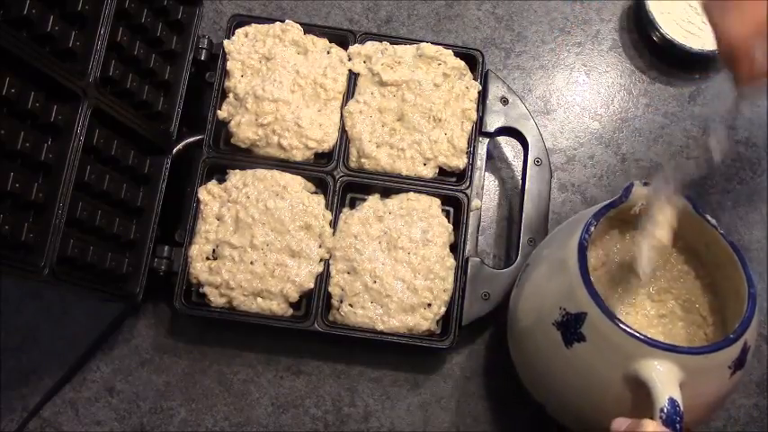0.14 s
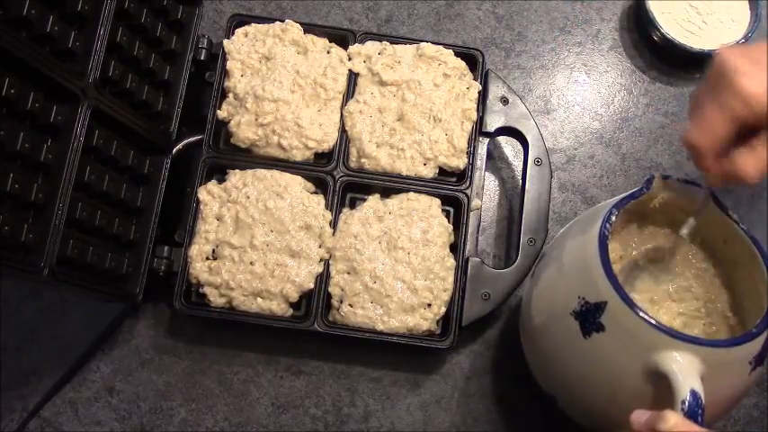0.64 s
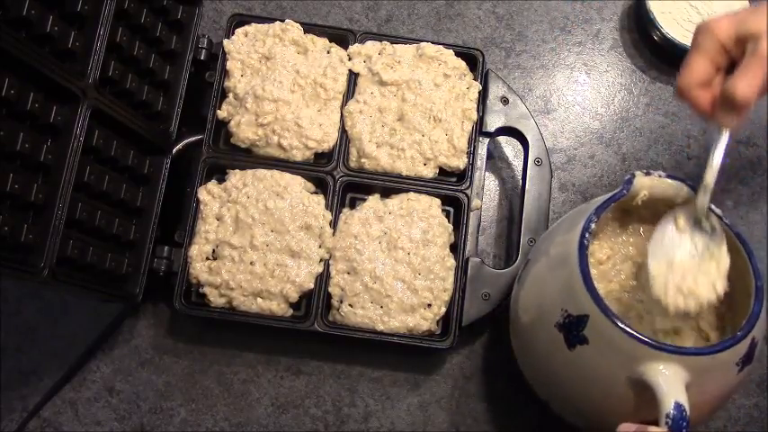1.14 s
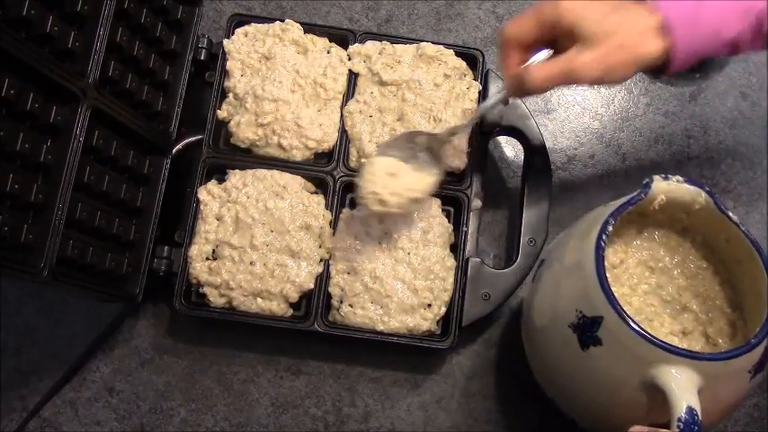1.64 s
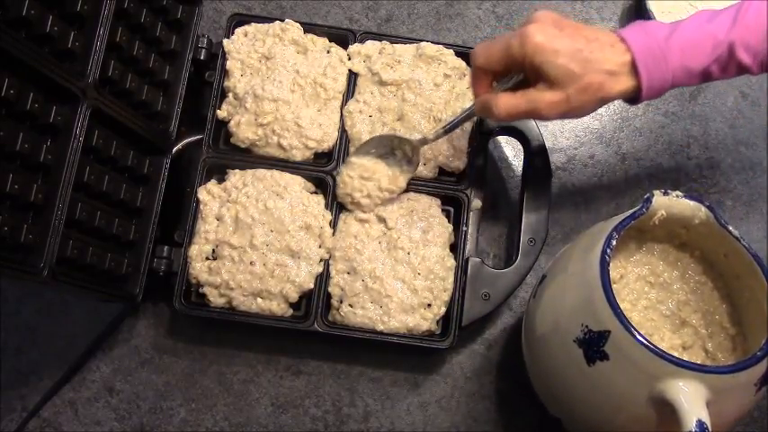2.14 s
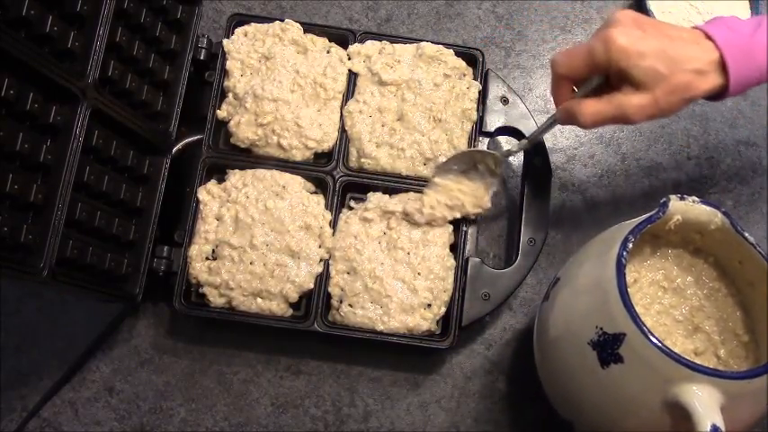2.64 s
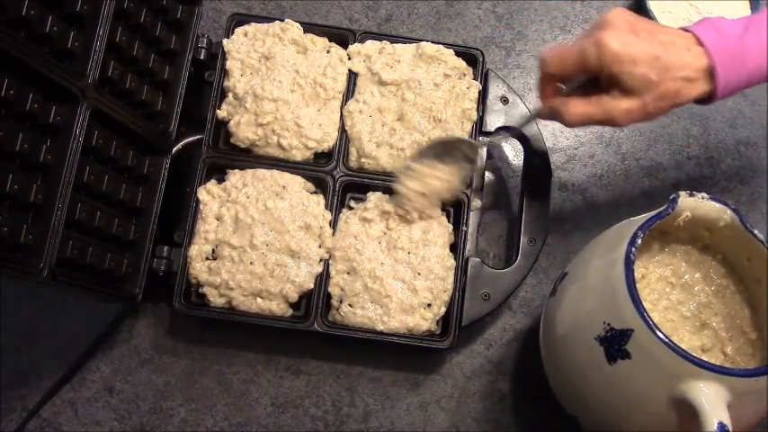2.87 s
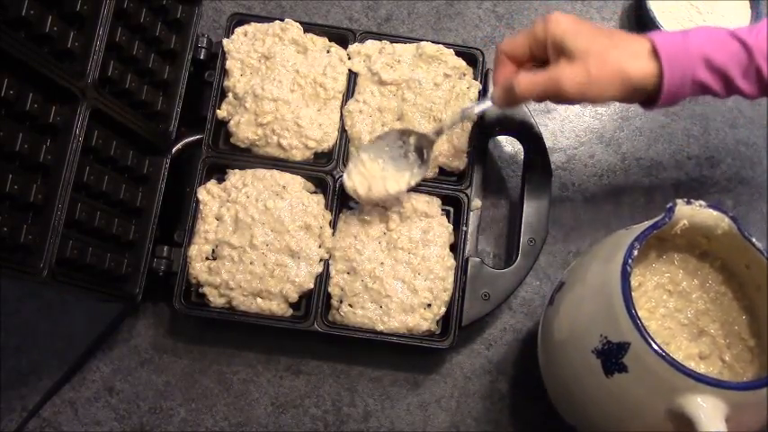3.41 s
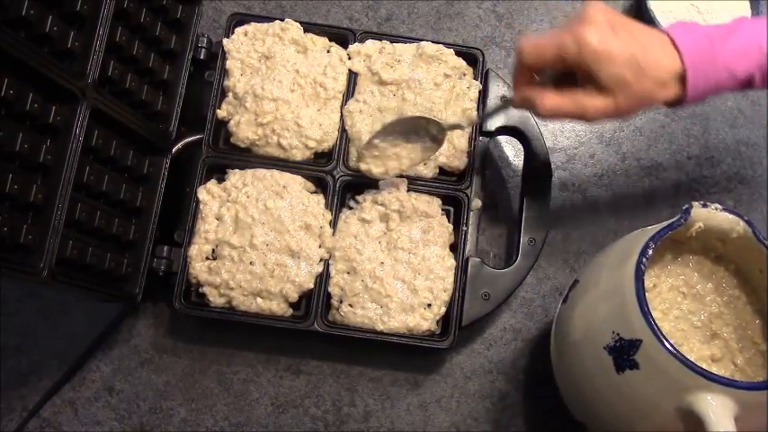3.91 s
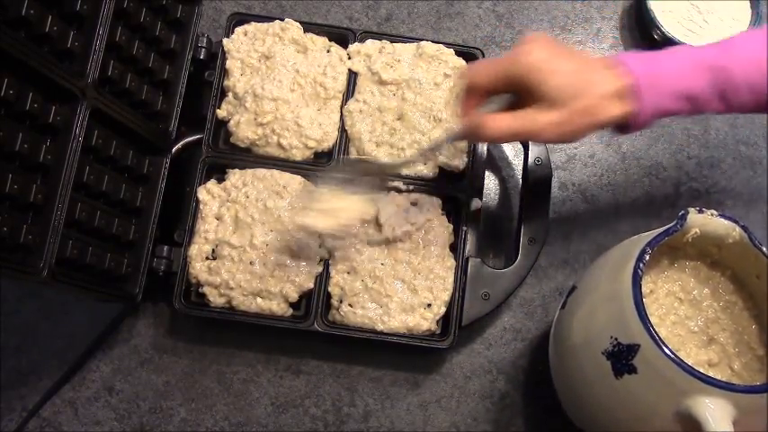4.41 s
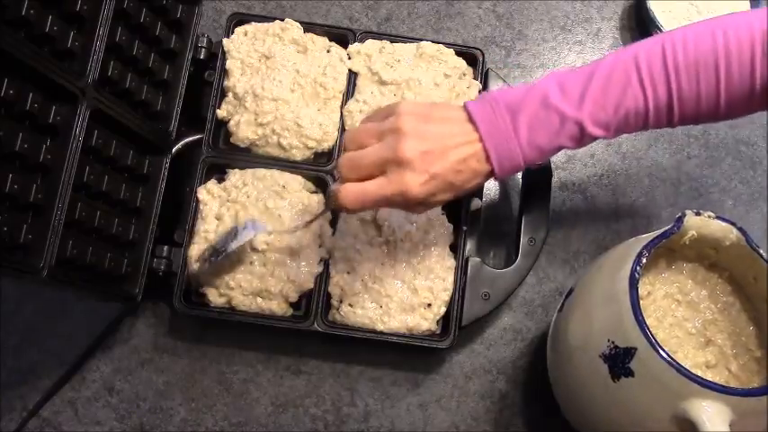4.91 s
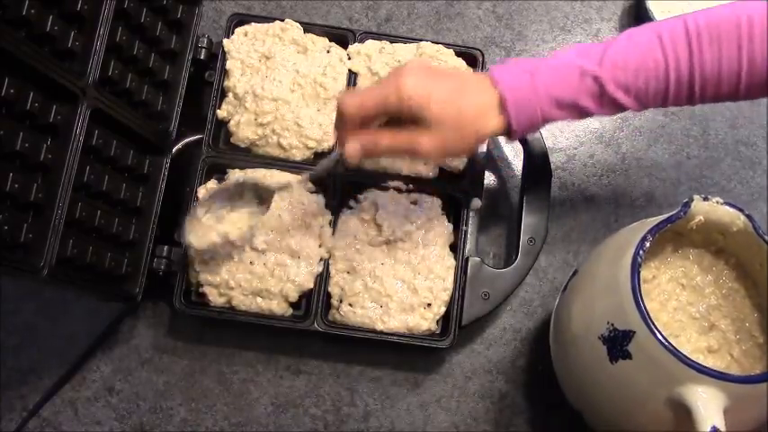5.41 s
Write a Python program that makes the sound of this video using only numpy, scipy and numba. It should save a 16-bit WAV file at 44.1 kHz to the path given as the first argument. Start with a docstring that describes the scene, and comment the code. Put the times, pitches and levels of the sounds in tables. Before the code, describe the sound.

A small, hard-surfaced kitchen, heard close in stereo. A low, quiet appliance drone runs throughout, under a fine hissing sizzle with dense crackle, soft gurgling and little steam pops, busiest at first and gradually thinning. At about 0.1 s a spoon gives the waffle iron a dull knock. At 0.33 s it clinks brightly in a stoneware pitcher and slides down the wall with a gritty scrape lasting a tenth of a second. Then only sizzle and pops until a faint tick and a strong clack at 2.15 s. A duller knock follows at 2.8, a bright hard one at 3.05, a tiny rising bubble at 3.5, another sharp clack at 4.1, a faint tick at 4.3, light touches and a firm knock around 4.8-4.9, and a last faint tick at 5.4. Knocks are very short and damped, with quick room reflections and a faint dull echo; loud hits are slightly compressed.

```python
"""A small hard kitchen: a spoon clinks and slides in a stoneware pitcher, and knocks through wet batter onto the
grid of a hot waffle iron. Blows are sums of damped modes with a noise crack and a low thud; the slide is
noise exciting the pitcher's modes. Batter sizzles and pops as short noise spits and damped tones, over a low
appliance drone of shaped noise. The room reflects blows and slide; gain control ducks the loudest sounds."""
import sys
import numpy as np
from scipy import signal
from scipy.fft import rfft, irfft
from scipy.io import wavfile
from scipy.ndimage import uniform_filter1d
from numba import njit

SR = 44100
rng = np.random.default_rng(int(sys.argv[2]) if len(sys.argv) > 2 else 0)


def gain_from_db(level_db):
    """Convert decibel levels to linear amplitude factors (20 dB per decade)."""
    decades = np.asarray(level_db, float) / 20
    return 10 ** decades


def dump(signal):
    """Clip the signal to [-1, 1] and save it as 16-bit WAV at the path in sys.argv[1]."""
    limited = np.clip(np.atleast_2d(signal).T, -1, 1)
    pcm = np.round(limited * 32767).astype(np.int16)
    wavfile.write(sys.argv[1], SR, pcm)


N = 243740  # samples
T = np.arange(N) / SR  # s

# blows on the iron: [t/s, thud level/dB, thud f/Hz of the loaded spoon bowl, ring level/dB,
# brightness/(dB per octave), favoured mode f/Hz]
IRON_BLOWS = [(0.0892, -11, 531, -24, -6, 1460), (2.1262, -29.5, 636, -40.5, 5, 4150),
              (2.167, -6, 673, -10, -1.5, 2930), (2.7681, -16.5, 604, -32, -13.5, 1750),
              (3.052, -10, 666, -6, -4, 3400), (4.0966, -11, 506, -6, -2, 2830),
              (4.2752, -34.5, 695, -38.5, 3, 4150), (4.778, -30.5, 460, -55, -10, 1700),
              (4.8105, -26, 628, -32.5, -9.5, 1800), (4.9275, -11.5, 616, -10, -3, 2260),
              (5.3965, -49.5, 720, -41, -10, 3520)]
# blow in the pitcher: [columns as for IRON_BLOWS]
PITCHER_BLOWS = [(0.3258, -21, 576, -14.5, 5.46, 3120)]
# resonances of the waffle iron: [f/Hz, level/dB, t60/s]
IRON_MODES = [(319.4, -7.5, 0.053), (367, -10.5, 0.061), (497, -20.5, 0.12), (617.4, -9.5, 0.07),
              (699, -6, 0.02), (839, -10.5, 0.082), (983, 3.5, 0.016), (1205, -4.5, 0.019),
              (1304, -7, 0.033), (1800, 1.5, 0.012), (2350, -1.5, 0.017), (2650, -7, 0.029),
              (2875, -4, 0.037), (3340, 1, 0.0083), (3650, 1.5, 0.011), (4128, 1, 0.011), (5304, 4, 0.004),
              (6170, -20.5, 0.0023), (6140, -10.5, 0.0032), (7550, -4, 0.0045), (10850, -7, 0.005),
              (13800, -33, .003)]
# resonances of the pitcher: [f/Hz, level/dB, t60/s]
PITCHER_MODES = [(1030, -3, 0.016), (1509, -7.5, 0.18), (1750, 5, 0.02), (2280, 4.5, 0.011),
                 (2533, 2, 0.016), (3178, 1, 0.028), (3850, -4, 0.021), (4180, 0, 0.0073),
                 (5000, -1, 0.0061), (6290, -4.5, 0.0084), (6570, -8.5, 0.024), (6850, -4.5, 0.0071),
                 (8260, -3.5, 0.0034), (9760, -7, 0.0043), (11200, -12.5, 0.0037), (13200, -23, .003)]
# the loudest steam pops in the batter: [t/s, treble spit level/dB, ring level/dB, ring f/Hz]
LOUD_POPS = [(0.0219, -32, -29, 3600), (0.0662, -28.5, -44, 1580), (0.169, -31, -39, 1980),
             (0.2438, -28, -32, 2050), (0.6923, -26, -41, 1470), (0.834, -27, -30, 2060),
             (0.8715, -28, -46, 1920), (0.9487, -41, -28.5, 3830), (1.1112, -26, -32, 3740),
             (1.4227, -31.5, -37, 3650), (1.6064, -36, -32, 3960), (1.8063, -22.5, -29, 3370),
             (1.828, -30, -47, 5500), (1.9678, -33, -40, 2100), (2.07, -53, -39, 1570),
             (2.3416, -37, -31, 2510), (2.5543, -41, -33, 3720), (2.7374, -52, -36, 1670),
             (2.8143, -29, -49, 1570), (3.5578, -42, -50, 1650), (3.6233, -38, -35, 3580),
             (4.431, -34, -38.5, 1800), (4.77, -50, -35, 1700), (5.0535, -29, -33, 1530)]
# colour of a spit of steam: [f/Hz, level/dB]
SPIT_COLOUR = [(800, -47), (3000, -1.5), (7000, 1.5), (11000, -2), (15000, -8), (20000, -30)]
# spectrum of the steam hiss: [f/Hz, level/dB per Hz]
HISS_SPECTRUM = [(470, -4.5), (800, 7), (1080, -1), (1450, 0), (2670, -2.5), (3830, 1.5), (6140, -4),
                 (9370, -2), (12200, -10.5), (15600, -24)]
# spectrum of the appliance drone: [f/Hz, level/dB per Hz]
DRONE_SPECTRUM = [(15, -70), (25, -53), (113, -39), (136, -0.5), (174, -10), (275, -2.5), (306, -11),
                  (341, 2.5), (390, -20), (423, -7.5), (1350, -16.5), (1710, -16), (1860, -19), (9350, -45),
                  (15600, -44)]
# stereo width of the drone: [f/Hz, side minus mid level/dB]
DRONE_WIDTH = [(60, 31), (110, -3.5), (200, -7), (380, -7), (700, -6), (1290, -8.5), (2380, -8.5),
               (4400, -4.5), (8120, 5), (15000, -8)]
# reverberation time of the kitchen: [f/Hz, t60/s]
ROOM_DECAY = [(200, 0.27), (530, 0.36), (1400, 0.35), (3700, 0.29), (9700, 0.16)]
# stereo width of the room response: [f/Hz, side minus mid level/dB]
ROOM_WIDTH = [(150, -24), (500, -29), (1500, -18), (5000, -13.5), (12000, -15)]
# reflections from counter, lid and cupboards: [delay/ms, level/dB]
REFLECTIONS = [(1.3, -8), (2.7, -4.5), (4.2, -10.5), (19.5, -65)]

SLAP_MS, SLAP_DB, SLAP_TOP_HZ = 122.5, -18, 1190  # one late, dull echo
THUD_BELOW_HZ, TILT_FROM_HZ = 850, 1350  # modes below the first follow the thud; brightness pivots on the second
# the spoon slides down the pitcher wall until the batter stops it
SLIDE_FROM_S, SLIDE_TO_S = 0.335, 0.449
SLIDE_DB, SLIDE_FADE_DB_PER_S, SLIDE_TILT_DB_PER_OCTAVE = -31.5, -31, 0.5
FIZZ_DB, FIZZ_FADE_DB_PER_S = -51.5, -0.96  # common gain of crackle and hiss at the start, and its fall
SPATTER_DB, SPATTER_FADE_S = -32, 2.1  # upper limit of the spits; time constant of their thinning out
GURGLE_DB, GURGLE_WANDER_DB = -61, 5  # rms before the wander
# one long bubble under the batter
BUBBLE_S, BUBBLE_SWELL_S, BUBBLE_RELEASE_S = 3.49, 0.082, 0.0081
BUBBLE_HZ, BUBBLE_RISE_HZ_PER_S, BUBBLE_DB = 288, 510, -44
DRONE_DB = -53  # rms before the wander


def read(table, hz):
    """Interpolation of a (f/Hz, value) table, linear in log frequency."""
    f, v = np.transpose(table)
    return np.interp(np.log(np.maximum(hz, 1)), np.log(f), v)


def level(x, db):
    """Normalisation to an rms level."""
    return x * gain_from_db(db) / np.sqrt(np.mean(x ** 2))


def colour(x, table):
    """Linear filtering: the spectrum is multiplied by a (f/Hz, level/dB) response."""
    hz = np.arange(len(x) // 2 + 1) * SR / len(x)
    return irfft(rfft(x) * gain_from_db(read(table, hz)), len(x))


def walk(rate):
    """Slow random fluctuation of unit spread: held random values, smoothed twice."""
    k = int(SR / rate)
    held = np.repeat(rng.standard_normal(N // k + 1), k)
    smooth = uniform_filter1d(uniform_filter1d(held, k), k)[:N]
    return smooth / smooth.std()


def add(out, s, x):
    """Superposition of x on out from time s."""
    i = int(s * SR)
    out[i:i + len(x)] += x[:len(out) - i]


def decay(t, t60):
    """Exponential damping: a fall of 60 dB in the time t60."""
    return np.exp(-np.log(1000) * t / t60)


def mode_rings(modes, t):
    """Free vibration: every mode is a damped sinusoid."""
    hz, _, t60 = np.transpose(modes)
    return np.sin(2 * np.pi * np.outer(hz, t)) * decay(t, t60[:, None])


def blows(table, modes, rise_ms, swell_ms, thud_t60, crack_db, crack_ms, snap_db, favour_db, away_db=6):
    """Modal excitation by impact: each blow rings the same modes, and a harder contact is brighter."""
    out, t = np.zeros(N), np.arange(SR // 4) / SR
    hz, db, _ = np.transpose(modes)
    rings = mode_rings(modes, t)
    sign = (-1.) ** np.arange(len(hz))  # neighbouring modes swing against each other
    lasts_ms = crack_ms * gain_from_db(0.18 * np.array(table)[:, 3:4])  # a light tick is over sooner
    grit = rng.standard_normal((len(table), len(t))) * np.exp(-t * 1000 / lasts_ms)
    grit[:, 24] += gain_from_db(snap_db)  # one hard click, half a millisecond in
    for (s, thud_db, thud_hz, ring_db, tilt_db, best_hz), noise in zip(table, grit):
        # low modes follow the thud, most those near its pitch; the others follow the hardness of contact
        low_db = thud_db - away_db * np.abs(np.log2(hz / thud_hz))
        high_db = ring_db + tilt_db * np.log2(hz / TILT_FROM_HZ)
        share_db = db + np.where(hz < THUD_BELOW_HZ, low_db, high_db)
        # the spot that is struck favours the mode that moves most there
        favoured = np.arange(len(hz)) == np.abs(hz - best_hz).argmin()
        mode_db = share_db + favour_db * favoured
        ring = sign * gain_from_db(mode_db) @ rings
        # countless small modes blur into a crack with the same outline as the strong ones
        crack = colour(noise, np.transpose([hz, crack_db + uniform_filter1d(mode_db, size=3)]))
        # the heavy bowl answers late, the later the duller the contact
        late_ms = swell_ms * gain_from_db(0.049 * (thud_db - ring_db - tilt_db))
        swell = 1 - np.exp(-t * 1000 / late_ms)
        damping = decay(t, thud_t60 * gain_from_db(0.19 * thud_db))  # a light thud dies sooner
        thud = gain_from_db(thud_db) * swell * np.sin(2 * np.pi * thud_hz * t) * damping
        onset = 1 - np.exp(-t * 1000 / rise_ms)
        add(out, s, thud + (ring + crack) * onset)
    # things this small radiate no bass
    return signal.sosfilt(signal.butter(3, 190, "high", fs=SR, output="sos"), out)


def slide():
    """Friction excitation: uneven grit under the sliding spoon keeps the pitcher's modes ringing."""
    hz, db, _ = np.transpose(PITCHER_MODES)
    mode_db = db + SLIDE_TILT_DB_PER_OCTAVE * np.log2(hz / TILT_FROM_HZ)
    body = gain_from_db(mode_db) @ mode_rings(PITCHER_MODES, np.arange(SR // 4) / SR)
    grit = rng.standard_normal(N) * gain_from_db(-3.0 * np.log(1 - rng.random(N)))
    rub = signal.fftconvolve(grit, body)[:N]
    rub = signal.sosfilt(signal.butter(2, 500, "high", fs=SR, output="sos"), rub)
    touch = np.interp(T, [SLIDE_FROM_S - 0.005, SLIDE_FROM_S, SLIDE_TO_S, SLIDE_TO_S + 0.014], [0, 1, 1, 0])
    fade = gain_from_db(SLIDE_FADE_DB_PER_S * np.clip(T - SLIDE_FROM_S, 0, 1))
    return level(rub, SLIDE_DB) * touch * fade


def pops(s, spit_db, ring_db, hz, cycles, spit_ms, tilt_db=0):
    """Bursting bubbles: each is a decaying spit of noise and a few cycles of damped ring."""
    t, rings, spits = np.arange(256) / SR, np.zeros(N + 256), np.zeros(N + 256)
    where = (s * SR).astype(int)[:, None] + np.arange(256)
    ring = np.sin(2 * np.pi * np.outer(hz, t)) * np.exp(-np.outer(hz, t) / cycles)
    spit = rng.standard_normal((len(s), 256)) * np.exp(-t * 1000 / spit_ms)
    np.add.at(rings, where, gain_from_db(ring_db)[:, None] * ring)
    np.add.at(spits, where, gain_from_db(spit_db)[:, None] * spit)
    tilted = [(f, db + tilt_db * np.log2(f / 8000)) for f, db in SPIT_COLOUR]
    return rings[:N] + colour(spits[:N], tilted)


def spatter():
    """Random point process of exponentially falling rate: middling pops, frequent at first, ever rarer."""
    when, spit, ring, pitch = rng.random((90, 4)).T
    s = -SPATTER_FADE_S * np.log(1 - when * (1 - np.exp(-N / SR / SPATTER_FADE_S)))
    spit_db = SPATTER_DB - 14 * spit ** 0.5
    ring_db = SPATTER_DB - 3.5 - 16 * ring
    return pops(s, spit_db, ring_db, 1300 * 3.2 ** pitch, cycles=1.5, spit_ms=0.7, tilt_db=6)


def sizzle():
    """Dense random pops of uneven size over steam noise, with band-passed noise gurgling under the batter."""
    when, spit, ring, pitch = rng.random((1500, 4)).T
    spit, ring = np.maximum(spit, 0.025), np.maximum(ring, 0.025)  # bounds the loudest pops
    spit_db, ring_db = -3.1 * np.log(spit) - 3, -2.8 * np.log(ring)
    crackle = pops(when * N / SR, spit_db, ring_db, 1200 * 6 ** pitch, cycles=0.47, spit_ms=0.17)
    hiss = colour(rng.standard_normal(N), HISS_SPECTRUM) * gain_from_db(1.4 * walk(22))
    # the sizzle dies down as the batter sets
    fade = gain_from_db(FIZZ_DB + FIZZ_FADE_DB_PER_S * T)
    fizz = (level(crackle, -0.73) + level(hiss, 1.63)) * fade
    band = signal.butter(1, [290, 360], "band", fs=SR, output="sos")
    gurgle = level(signal.sosfilt(band, rng.standard_normal(N)), GURGLE_DB)
    return fizz + gurgle * gain_from_db(GURGLE_WANDER_DB * walk(3.02))


def bubble():
    """Cavity resonance: a short low tone swells and rises as the steam pocket shrinks, then bursts."""
    t = T - BUBBLE_S
    swell = np.interp(t, [0, BUBBLE_SWELL_S, BUBBLE_SWELL_S + BUBBLE_RELEASE_S], [0, 1, 0])
    envelope = swell * gain_from_db(3.3 * walk(65))
    turns = (BUBBLE_HZ + BUBBLE_RISE_HZ_PER_S * t / 2) * t
    return np.sqrt(2) * gain_from_db(BUBBLE_DB) * envelope * np.sin(2 * np.pi * turns)


def kitchen(dry, wet_db, build_ms):
    """Room response by convolution: a few near reflections, a diffuse tail with short treble, one late echo."""
    t = np.arange(SR // 2) / SR
    tail = np.zeros((2, len(t)))
    for hz in 125 * 2. ** np.arange(8):
        edges = [hz / np.sqrt(2), min(hz * np.sqrt(2), 0.45 * SR)]
        band = signal.butter(2, edges, "band", fs=SR, output="sos")
        tail += signal.sosfilt(band, rng.standard_normal(tail.shape)) * decay(t, read(ROOM_DECAY, hz))
    mid, side = tail * gain_from_db(wet_db) * (1 - np.exp(-t * 1000 / build_ms))
    mid[0] = 1  # direct sound
    side[1] = 0.044  # the direct sound reaches the two ports a little apart
    for ms, db in REFLECTIONS:
        mid[int(ms * SR / 1000)] += gain_from_db(db)
    far = np.arange(len(t)) == int(SLAP_MS * SR / 1000)
    mid += gain_from_db(SLAP_DB) * signal.sosfilt(signal.butter(2, SLAP_TOP_HZ, fs=SR, output="sos"), far)
    side = colour(side, ROOM_WIDTH)
    return np.array([signal.fftconvolve(dry, mid + sign * side)[:N] for sign in (1, -1)])


def drone():
    """Stationary shaped noise of appliance and room, widest in the bass, its level wandering slightly."""
    mid, side = (colour(rng.standard_normal(N), DRONE_SPECTRUM) for _ in range(2))
    side = colour(side, DRONE_WIDTH)
    return level(np.array([mid + side, mid - side]), DRONE_DB) * gain_from_db(0.9 * walk(4))


def scene():
    """Superposition: blows and slide ring through the kitchen; pops, sizzle and drone lie under them."""
    knocks = blows(IRON_BLOWS, IRON_MODES, rise_ms=0.092, swell_ms=0.24, thud_t60=0.051,
                   crack_db=-6, crack_ms=11, snap_db=22, favour_db=4.5)
    clink = blows(PITCHER_BLOWS, PITCHER_MODES, rise_ms=0.078, swell_ms=0.91, thud_t60=0.11,
                  crack_db=-10, crack_ms=4.8, snap_db=-3, favour_db=2.0)
    struck = kitchen(knocks + clink + slide(), wet_db=-32.0, build_ms=0.33)
    loud_pops = pops(*np.transpose(LOUD_POPS), cycles=2.7, spit_ms=1.0)
    batter = loud_pops + spatter() + sizzle() + bubble()
    # the pan is wide: left and right hear it a little apart
    apart = gain_from_db(-28) * np.outer([1, -1], np.roll(batter, 9))
    return struck + batter + apart + drone()


@njit
def follow(x, attack, release):
    """Envelope detection: a level follower that rises quickly and falls slowly."""
    out, e = np.empty(len(x)), 0.
    for i in range(len(x)):
        e += (x[i] - e) * (attack if x[i] > e else release)
        out[i] = e
    return out


def band_limit(x):
    """A steep low-pass at the top of the band."""
    return signal.sosfilt(signal.butter(12, 16810, fs=SR, output="sos"), x)


def record(dry, knee_db=-19, attack_ms=12.8, release_ms=172.0, squeeze=0.58):
    """Microphone and compression: the very top is lost, loud sounds are ducked, peaks rounded, rumble cut."""
    x = signal.sosfilt(signal.butter(8, 15600, fs=SR, output="sos"), dry)
    loudness = follow(np.abs(x).max(axis=0), 1000 / (attack_ms * SR), 1000 / (release_ms * SR))
    ducked = x * np.minimum(gain_from_db(knee_db) / (loudness + 1e-9), 1) ** squeeze
    rounded = np.tanh(ducked)
    rumble_cut = signal.butter(2, 48, "high", fs=SR, output="sos")
    return band_limit(signal.sosfilt(rumble_cut, rounded))


dry = scene()
out = record(dry)
dump(out)
```